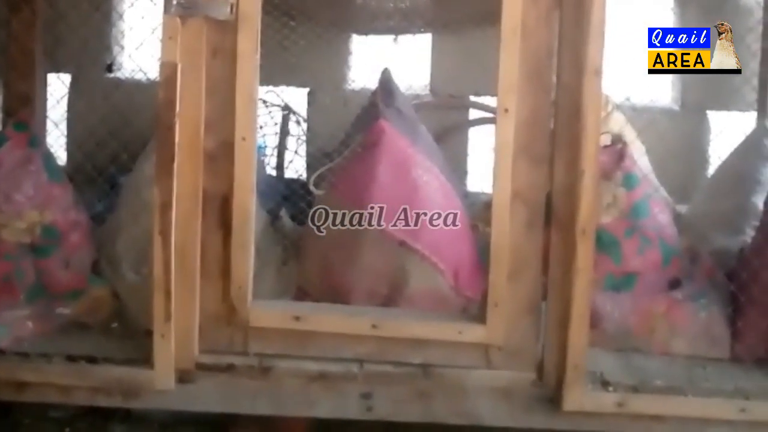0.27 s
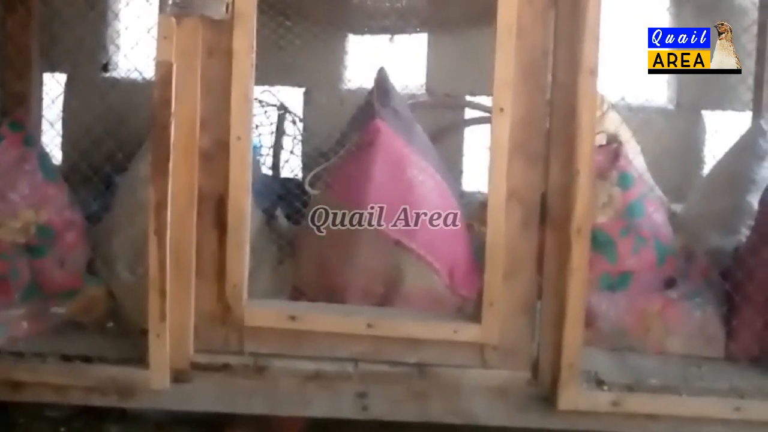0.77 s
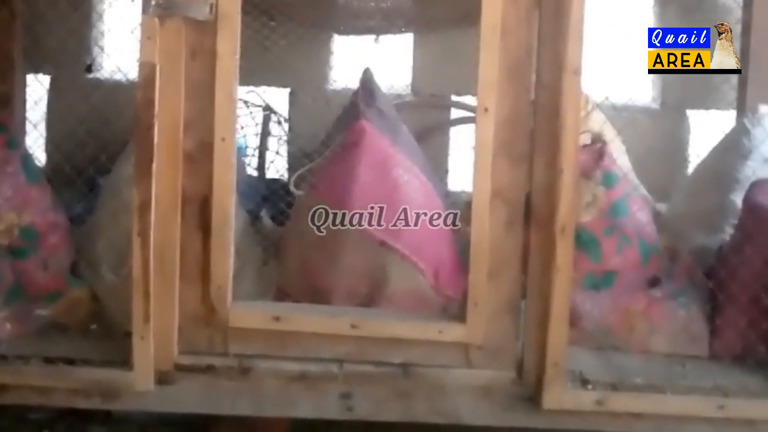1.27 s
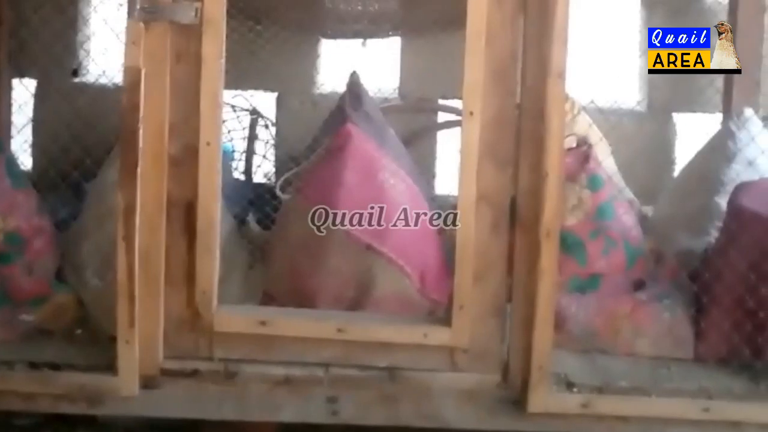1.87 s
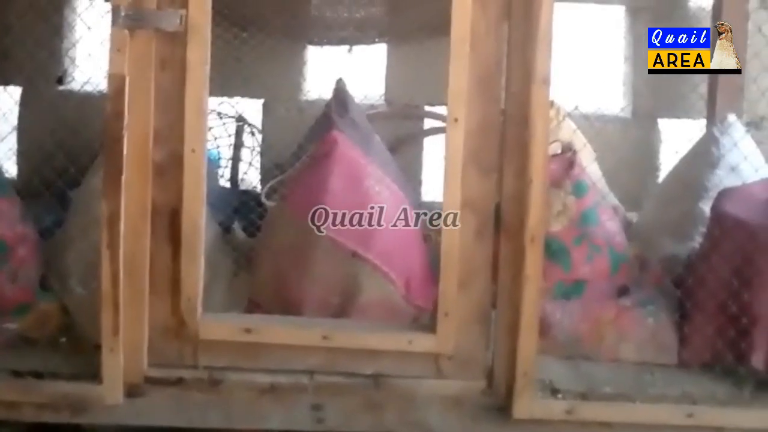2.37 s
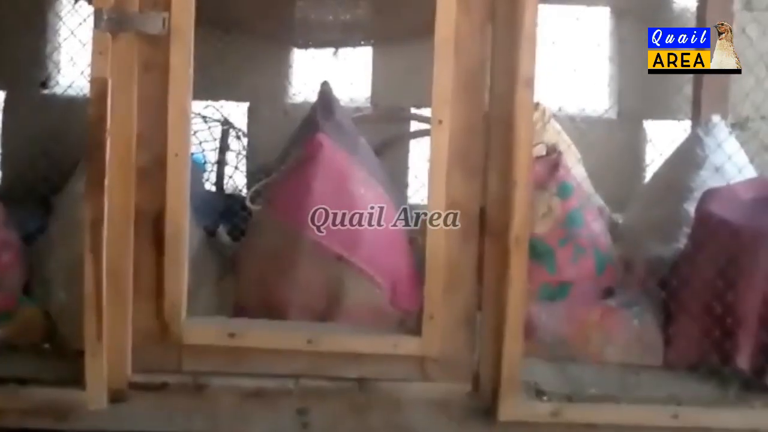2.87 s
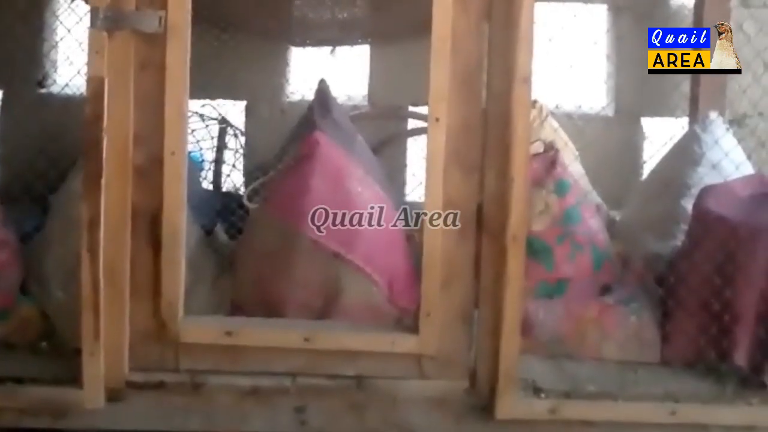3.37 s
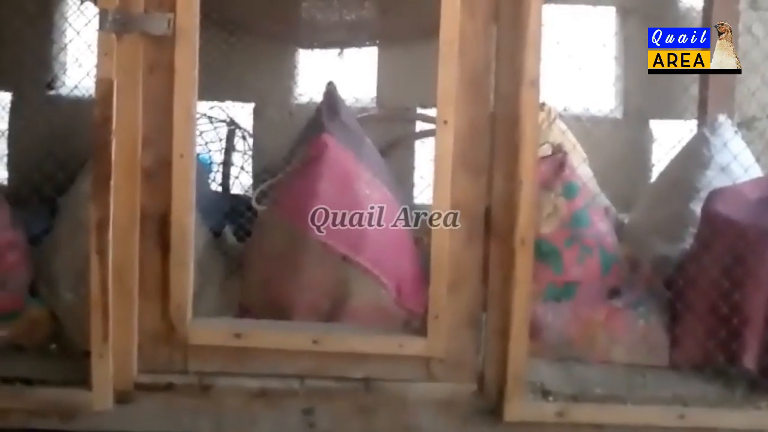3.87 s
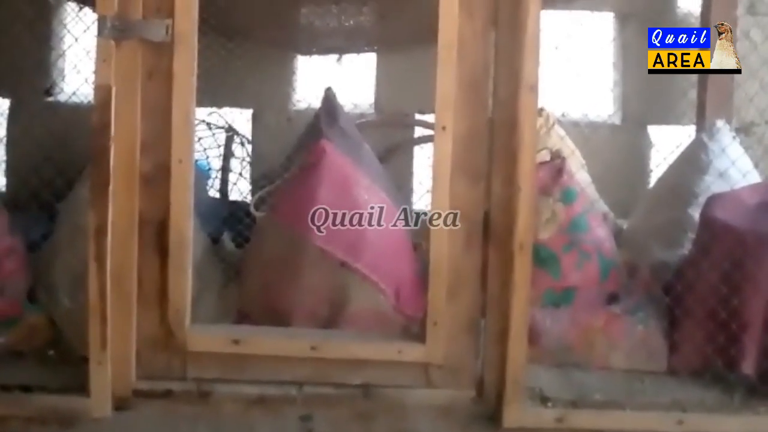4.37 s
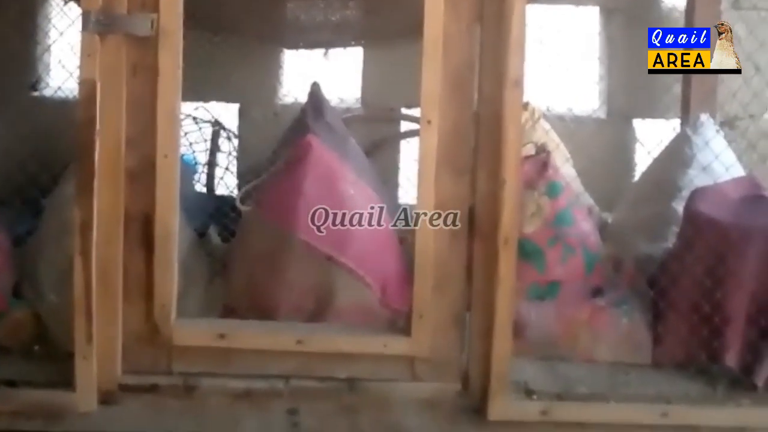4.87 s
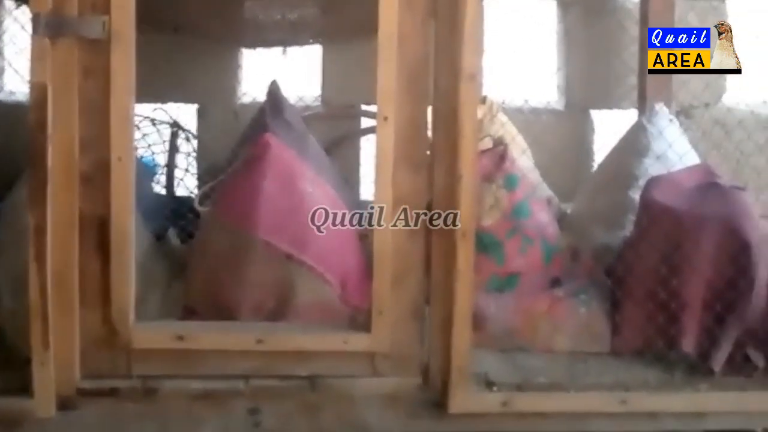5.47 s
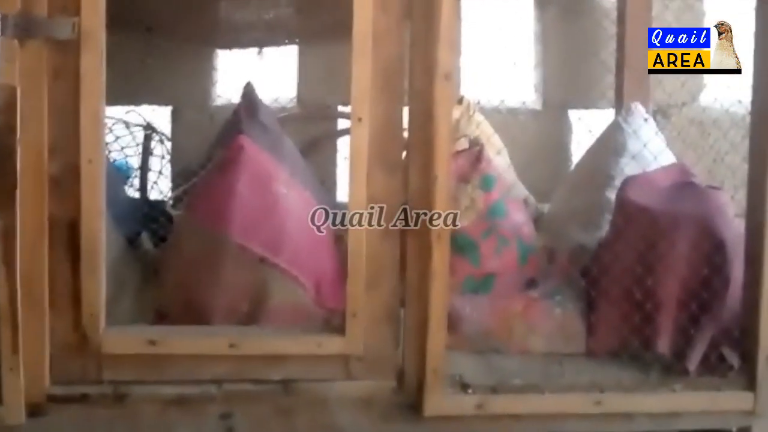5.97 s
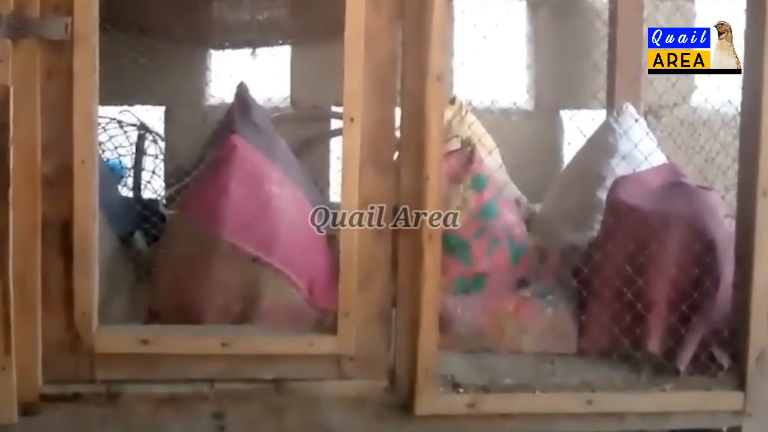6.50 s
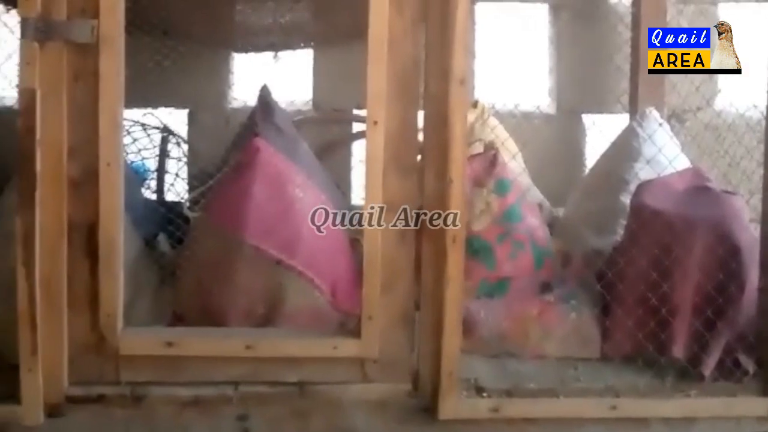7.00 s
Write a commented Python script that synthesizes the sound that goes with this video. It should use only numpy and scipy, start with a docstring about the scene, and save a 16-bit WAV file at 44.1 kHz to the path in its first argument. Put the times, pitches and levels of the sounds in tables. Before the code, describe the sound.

Several quails in wooden cages inside a hard-walled shed call over each other. High peeps flick upward and lower chips jump and slide back. In the first three seconds, the nearest bird gives three groups of three loud whipped whistles, overloading the close microphone, each with a short churr. Then two-part rasping crows come about once a second. The wooden cage thumps, and faint whines and distant cheeps sit in quiet room air.

```python
"""Caged quails in a hard-walled shed

Quails call over one another: high peeps flick upward, lower chips jump and slide back, and the nearest
bird whips out whistles that overload the microphone; all are gliding tones with a few overtones.
Two-part rasping crows, about once a second in the later part, and short churrs are fluttering buzzes
through a mouth resonance. Bumps ring the wooden cage; faint whines, distant cheeps and room air lie below.
"""
import sys
import numpy as np
from scipy import signal
from scipy.fft import rfft, irfft
from scipy.io import wavfile
from scipy.ndimage import map_coordinates

SR = 44100
rng = np.random.default_rng(int(sys.argv[2]) if len(sys.argv) > 2 else 0)


def store_pcm(level_fs):
    """Save levels as 16-bit WAV."""
    pcm = np.round(np.clip(level_fs, -1, 1) * 32767).astype(np.int16)
    wavfile.write(sys.argv[1], SR, np.atleast_2d(pcm).T)


N = 319284
TIME = np.arange(N) / SR  # s


def amp(db):
    """Decibels to gain."""
    return 10 ** (np.asarray(db) / 20)


def evened(x):
    """Scales to rms 1."""
    return x / np.sqrt(np.mean(x ** 2) + 1e-20)


def read(points, hz):
    """Reads a curve over frequency, interpolating on a log-frequency axis."""
    f, value = np.transpose(points)
    return np.interp(np.log(hz + 1), np.log(f + 1), value)


def coloured(x, points):
    """Filters by a spectrum in dB."""
    gain = amp(read(points, np.fft.rfftfreq(len(x), 1 / SR)))
    return irfft(rfft(x) * gain, len(x))


def waver(t, per_s):
    """Smooth random motion of about unit size, with per_s random points a second."""
    return map_coordinates(rng.standard_normal(512), [(t - t[0]) * per_s], order=3, mode="wrap")


def step(t, over_s):
    """A smooth rise from 0 to 1, half way at t = 0."""
    return .5 + .5 * np.tanh(t / over_s)


def bump(x, width):
    """A bell curve of height 1 around x = 0."""
    return np.exp(-(x / width) ** 2)


def gate(t, attack_s, release_s):
    """Attack, hold and release."""
    edge = np.minimum((t - t[0]) / attack_s, (t[-1] - t) / release_s)
    return np.sin(np.pi / 2 * np.clip(edge, 0, 1)) ** 2


def add(mix, s, sound):
    """Mixes a sound in at time s, trimming what falls outside."""
    at = round(s * SR)
    sound = sound[max(-at, 0):]
    part = mix[max(at, 0):][:len(sound)]
    part += sound[:len(part)]


def calls(rows, voice):
    """Plays one call for each row; the voice returns its start relative to the row's time."""
    out = np.zeros(N)
    for s, *shape in rows:
        lead, sound = voice(*shape)
        add(out, s + lead, sound)
    return out


def whistle(t, hz, db, overtones_db, jitter):
    """A nearly pure tone that follows a pitch and a level, with a few overtones."""
    hz = hz * (1 + jitter * waver(t, 350))
    phase = 2 * np.pi * np.cumsum(hz) / SR
    tone = np.sin(phase)
    for k, over_db in enumerate(overtones_db, 2):
        below_nyquist = k * hz < SR / 2
        tone = tone + amp(over_db) * np.sin(k * phase) * below_nyquist
    return np.sqrt(2) * tone * amp(db)


def air(room_db=-55, hiss_db=-69, drift_db=1.5):
    """Gently drifting room noise and a thin band of electronic hiss, both filtered white noise."""
    # tone of the air in the shed: (frequency [Hz], relative level [dB])
    room_colour = [(18, -48), (32, -21), (100, -17), (260, -12), (420, -16), (1100, -24), (1800, -22),
                   (2800, -16), (3500, -12), (5400, -19), (6500, -19), (7600, -35), (10000, -32),
                   (13300, -32), (15400, -32), (16000, -70)]
    band = [(12200, -40), (12500, -8), (12950, 0), (13150, -40)]  # Hz, relative dB
    room = evened(coloured(rng.standard_normal(N), room_colour)) * amp(drift_db * waver(TIME, 4.4))
    hiss = evened(coloured(rng.standard_normal(N), band))
    return amp(room_db) * room + amp(hiss_db) * hiss


def peep(length, pitch_hz, note_db, flick_db):
    """A held note sags, creeps up, then flicks up about an octave as it dies."""
    t = np.arange(-length - .003, .03, 1 / SR)
    # the sag of 9000 Hz/s ends 46 ms ahead of the flick, so a longer peep starts higher
    sag_hz = 9000 * np.maximum(-t - .046, 0)
    creep_hz = 260 * step(t + .016, .014)
    held_hz = pitch_hz + sag_hz + creep_hz
    top_hz = 7420 + 38 * flick_db  # softer flicks stop lower
    hz = held_hz + (top_hz - held_hz) * step(t - .0025, .007)

    along = np.clip(1 + t / length, 0, 1)
    swell_db = 3.7 * np.sin(np.pi * along ** 1.4)
    dip_db = -3 * bump(hz - 4150, 400)  # as the flick sets off
    fade_db = -1450 * np.maximum(t - .007, 0)  # 1450 dB/s after a 7 ms hold
    db = note_db + (flick_db - note_db) * along ** 1.5 + swell_db + dip_db + fade_db
    octave_db = -27 - 9 * step(t - .0025, .007)  # the overtone weakens in the flick
    return t[0], whistle(t, hz, db, (octave_db, -54), jitter=.0035) * gate(t, .011, .003)


def echoes(x, t60s, delay):
    """Sparse reflections of random sign in three patterns that take turns; each band dies at its own speed."""
    out = np.zeros(N)
    for k in range(3):
        taps = rng.choice([-1., 1.], SR) * (rng.random(SR) < 1 / 10) * (TIME[:SR] > delay)
        hz, t, bands = signal.stft(taps, SR, nperseg=128)
        decay = amp(-60 * t / read(t60s, hz)[:, None])
        tail = signal.istft(bands * decay, SR, nperseg=128)[1]
        # the three squared shares always add up to one
        share = np.sqrt(2 / 3) * np.cos(np.pi * (TIME + k / 3))
        out += signal.fftconvolve(x * share, tail / np.linalg.norm(tail))[:N]
    return out


def chip(length, pitch_hz, note_db, flick_db):
    """A swelling low note bends up, jumps to its top, then slides faintly back down."""
    top_hz, end_hz = 4950, 1450
    t = np.arange(-length - .003, .065, 1 / SR)
    held_hz = pitch_hz + 700 * np.clip(1 + t / length, 0, 1) ** 2.1
    flick = step(t, .0035)
    slide = step(t - .026, .009)
    hz = held_hz + (top_hz - held_hz) * flick + (end_hz - top_hz) * slide

    after = np.maximum(t, 0)
    # a fast fade of 1450 dB/s gives way to the faint slide, which fades at 420 dB/s
    fade_db = np.maximum(-1450 * after, -19 - 420 * after)
    db = note_db + (flick_db - note_db) * flick + fade_db
    # the note swells over 0.8 of its length
    return t[0], whistle(t, hz, db, (-35, -43), jitter=.007) * gate(t, .8 * length, .004)


def cheep(length, top_hz, db):
    """A quavering note that arches and falls; the quaver is a fast random waver of its pitch."""
    t = np.arange(0, length, 1 / SR)
    arch = [0, length / 4, length]
    hz = top_hz * np.interp(t, arch, [.92, 1, .82])
    level_db = db + np.interp(t, arch, [-12, 0, -6])
    return 0, whistle(t, hz, level_db, (-28,), jitter=.094) * signal.windows.tukey(len(t), .2)


def whip(level_db, pitch_hz, opening_db, noise_db=-26):
    """A soft low opening swells into a loud whistle that whips upward; thin treble noise follows its level."""
    # colour of the treble noise heard around the whistle: (frequency [Hz], relative level [dB])
    noise_colour = [(800, -25), (3000, -8), (7000, -3), (10500, 3), (12500, -9), (14500, -3)]
    first_hz, cut_s = 1300, .004
    t = np.arange(-.042, cut_s / 2, 1 / SR)
    # the whistle keeps climbing at 12000 Hz/s through its loudest moment, passing pitch_hz at -8 ms
    held_hz = pitch_hz + 12000 * (t + .008)
    bend = step(t + .024, .009)  # from the low opening up to the pitch
    flick_hz = 3300 * step(t + .0005, .0034)
    hz = first_hz + (held_hz - first_hz) * bend + flick_hz

    db = level_db + opening_db * step(-t - .0185, .0055)
    db = db - 7 * bump(hz - 2320, 170)  # the level dips as the pitch passes 2320 Hz
    noise = amp(db + noise_db) * coloured(rng.standard_normal(len(t)), noise_colour)
    return t[0], (whistle(t, hz, db, (-40, -46), jitter=.0032) + noise) * gate(t, .014, cut_s)


def rasp(t, hz, flutter_hz, gape_hz, swing=.042, depth=.4, throb=.21, width_hz=230, low_db=-13,
         kick_db=1, ring_s=.004):
    """A buzz with a fast flutter rings a mouth resonance that rises from the second harmonic as the beak opens."""
    mouth_hz = 2 * hz + gape_hz
    flutter = 2 * np.pi * np.cumsum(flutter_hz * (1 + .0069 * waver(t, 40))) / SR
    buzz_hz = hz * (1 + swing * np.sin(flutter) + .0032 * waver(t, 300))
    phase = 2 * np.pi * np.cumsum(buzz_hz) / SR

    k = np.arange(1, 9)[:, None]  # harmonic numbers
    # the mouth picks out one or two harmonics; the throat always passes those near 1150 Hz
    mouth = 1 / (1 + ((k * hz - mouth_hz) / width_hz) ** 2) ** .7
    throat = amp(low_db) / (1 + ((k * hz - 1150) / 200) ** 2)
    tilt = amp(read([(550, -5), (1100, -1.5), (3900, 1), (5000, -15)], k * hz))
    gains = (mouth + throat) * tilt
    gains = gains / np.linalg.norm(gains, axis=0)
    # the flutter splits each harmonic into close lines
    split = 1 + depth * np.cos(2 * flutter + 1.21 * k)
    buzz = (gains * split * np.sin(k * phase)).sum(0)

    # each flap also kicks the mouth, which rings at its own pitch
    age = flutter % (2 * np.pi) / (2 * np.pi * flutter_hz)  # s since the flap
    kick = np.exp(-age / ring_s) * abs(np.sin(flutter / 2)) ** .47 * np.sin(2 * np.pi * mouth_hz * age)
    # a higher mouth resonance throbs harder
    beats = np.exp(throb * np.cos(flutter - 1) * mouth_hz / 2500)
    return evened(coloured((buzz + 2 * amp(kick_db) * kick) * beats, [(300, -12), (520, 0)]))


def churr(level_db, pitch_hz):
    """A short rasp through a closing beak, with an accent when it is half shut."""
    t = np.arange(-.047, .062, 1 / SR)
    db = level_db + 8 * bump(t, .011)
    gape_hz = 2050 * step(-t, .022)
    sound = rasp(t, pitch_hz + 900 * t, 87, gape_hz)  # climbs 900 Hz/s, flutters at about 87 Hz
    return t[0], amp(db) * sound * gate(t, .014, .014)


def cage(rattle_t60=.38):
    """Each bump rings the damped modes of the wooden frame and briefly rattles the wire."""
    # bumps: (time [s], ring level [dB], rattle level [dB], lowest mode that is shaken [Hz])
    bumps = [(1.149, -39.5, -60.5, 110), (1.27, -39.5, -77.5, 100), (1.369, -52.5, -81.5, 100),
             (4.932, -34, -46, 150), (4.958, -24, -36, 80), (5.029, -29, -43.5, 70),
             (5.082, -29, -32.5, 100), (5.164, -35.5, -62, 90), (6.153, -24.5, -33.5, 190),
             (6.241, -39.5, -59, 190)]
    # modes of the wood ahead of a small random detune: (frequency [Hz], relative level [dB], t60 [s])
    wood = [(82, -5.5, 0.94), (111.6, 4, 0.55), (129, -3, .35), (169.8, -2.5, 0.68), (202.5, -3.5, 0.54),
            (234.2, -2.5, 0.27), (331, -8, 0.18), (452, -7.5, 0.079), (580, -13.5, 0.13)]
    wire = [(40, -24), (200, -3.5), (700, -10), (1400, -6), (3000, -18.5), (9000, -46.5)]  # Hz, dB
    out, t = np.zeros(N), np.arange(SR // 2) / SR
    for s, db, rattle_db, low_hz in bumps:
        ring = np.zeros(len(t))
        for hz, mode_db, t60 in wood:
            level = amp(mode_db - 60 * t / t60) / (1 + (low_hz / hz) ** 8)
            cycles = hz * rng.uniform(.99, 1.03) * t + rng.random()
            ring += level * np.sin(2 * np.pi * cycles)
        rattle = evened(coloured(rng.standard_normal(len(t)), wire))
        sound = amp(db) * ring + amp(rattle_db - 60 * t / rattle_t60) * rattle
        add(out, s, sound * (1 - np.exp(-t / .0017)))  # soft onset
    return out


def whine(length, first_hz, last_hz, db):
    """A soft, nasal, slowly sliding note, strongest on its third and fourth harmonics."""
    t = np.arange(0, length, 1 / SR)
    hz = np.linspace(first_hz, last_hz, len(t))
    level_db = np.linspace(db - 14, db - 21.5, len(t))
    return 0, whistle(t, hz, level_db, (2, 13, 13, 1), jitter=.029) * signal.windows.tukey(len(t), .4)


def crow(level_db, top_hz, gape):
    """The pitch climbs and droops while the beak opens twice; the wider the beak, the louder."""
    # the beak's two openings: (opens at [s], opening takes [s], shuts at [s], shutting takes [s],
    # rise of the mouth resonance before the gape factor [Hz])
    gapes = [(-.1, .026, -.009, .008, 1080), (.095, .02, .183, .05, 1900)]
    after_s, peak_s = .217, .085
    t = np.arange(-.167, after_s, 1 / SR)
    late = np.maximum(t - peak_s, 0) / (after_s - peak_s)
    hz = top_hz - 620 * np.maximum(peak_s - t, 0) - 120 * late ** 2  # climbs 620 Hz/s, droops 120 Hz
    gape_hz = 0
    for opens, opening, shuts, shutting, rise_hz in gapes:
        gape_hz = gape_hz + gape * rise_hz * step(t - opens, opening) * step(shuts - t, shutting)
    # the flutter quickens as the second part begins, then settles
    flutter_hz = np.where(t < 0, 64.5, 71 + 24 * bump(t, .055))
    db = level_db + 22 * t + .006 * gape_hz
    return t[0], amp(db) * rasp(t, hz, flutter_hz, gape_hz) * gate(t, .055, .04)


def scene():
    """The nearest bird is almost dry; the other calls bring cage walls or shed, the cheeps only echoes."""
    # all levels below are ahead of the mix and the microphone
    # high peeps: (time of the flick [s], length before it [s], pitch [Hz], note level [dB], flick level [dB])
    peep_rows = [(.082, .086, 3335, -13, -19.5), (.128, .049, 3156, -21.5, -25.5),
                 (.313, .05, 3320, -11.5, -18.5), (.357, .055, 3250, -25, -19.5),
                 (.555, .075, 3220, -19, -17), (.838, .066, 3200, -17.5, -15.5),
                 (1.571, .066, 3320, -9, -18), (1.618, .059, 3175, -16, -22),
                 (1.798, .056, 3320, -10.5, -18), (1.84, .087, 3184, -22, -17),
                 (1.909, .067, 3200, -17.5, -15), (2.202, .071, 3252, -15.5, -14.5),
                 (3.072, .075, 3300, -15, -15.5), (3.112, .055, 3314, -9.5, -19),
                 (3.28, .086, 3325, -16, -17.5), (3.306, .041, 3287, -10, -19),
                 (3.336, .04, 3210, -15, -16), (3.57, .064, 3222, -12, -15.5),
                 (4.593, .06, 3248, -10, -17.5), (4.647, .04, 3364, -11.5, -16),
                 (4.817, .053, 3297, -12, -18), (4.939, .066, 3215, -12.5, -16),
                 (6.025, .088, 3320, -14, -15.5), (6.072, .049, 3314, -13, -18),
                 (6.183, .045, 3285, -22, -33), (6.3, .047, 3220, -8.5, -18),
                 (6.319, .029, 3330, -19, -14.5), (7.175, .087, 3190, -17, -18.5)]
    # lower chips: (time of the flick [s], length before it [s], pitch [Hz], note level [dB], flick level [dB])
    chip_rows = [(.355, .03, 2040, -20.5, -19), (.768, .04, 2200, -13, -13), (.985, .031, 2250, -18, -28),
                 (1.515, .028, 2064, -20.5, -15), (1.93, .041, 2200, -12.5, -14),
                 (2.157, .034, 2166, -18, -27), (3.445, .035, 2100, -18, -18),
                 (3.677, .047, 2050, -20, -23), (4.098, .028, 2300, -14.5, -19),
                 (4.517, .04, 2184, -15.5, -15), (4.737, .045, 2093, -19, -27),
                 (5.193, .032, 2280, -14.5, -16), (5.611, .04, 2217, -14.5, -15),
                 (5.828, .041, 2122, -22, -32), (6.747, .041, 2200, -13.5, -15),
                 (6.964, .04, 2127, -23, -35)]
    # cheeps from farther cages: (time [s], length [s], top of the arch [Hz], level [dB])
    cheep_rows = [(.44, 0.055, 4870, -49.5), (1.28, 0.14, 4475, -44.5), (1.42, .08, 6600, -49.5),
                  (2.4, 0.19, 4220, -58.5), (2.56, .12, 3960, -54.5), (2.82, 0.077, 6310, -58.5),
                  (4.45, .1, 4420, -38), (5.44, .14, 4190, -46), (5.74, 0.043, 6000, -53.5),
                  (6.52, 0.055, 4320, -41), (6.84, 0.036, 2960, -42)]
    # near whips: (time of the flick [s], level [dB], pitch [Hz], low opening relative to the level [dB])
    whip_rows = [(.709, -8.5, 2030, -36), (.922, -3, 2100, -29), (1.053, -2.5, 2080, -27),
                 (1.745, -2, 2060, -38), (1.953, -1, 2080, -27), (2.08, -1, 2060, -23),
                 (2.765, -2.6, 2060, -38), (2.975, -1, 2080, -28), (3.103, -1, 2080, -25)]
    # churrs between two whips: (time when the beak is half shut [s], level [dB], pitch [Hz])
    churr_rows = [(.977, -27.5, 510), (2.007, -25, 560), (3.029, -24, 548)]
    # faint whines: (time [s], length [s], first pitch [Hz], last pitch [Hz], level setting [dB])
    whine_rows = [(2.5, 0.3, 530, 460, -58), (3.78, 0.23, 690, 590, -55), (4.42, .25, 520, 453, -48.5),
                  (5.42, 0.25, 649, 491, -51), (5.72, .07, 447, 509, -56.5), (6.83, 0.12, 447, 496, -60)]
    # crows: (time of the beak's closing between the parts [s], level [dB], top pitch [Hz], gape factor)
    crow_rows = [(3.256, -32.5, 595, 1.0), (4.229, -29, 642, 1.02), (5.206, -28, 660, 1.05),
                 (6.211, -28.5, 665, 1.04), (7.24, -30.5, 649, 1.08)]
    # ring of the shed: (frequency [Hz], t60 [s])
    shed = [(500, .5), (2000, 0.18), (3500, 0.41), (7000, 0.25), (12000, 0.13)]
    # colour of the microphone: (frequency [Hz], level [dB])
    microphone = [(100, -9.5), (1000, 3.5), (3300, 0), (5000, 0.5), (6900, 1), (7400, 0), (10000, -6.5),
                  (12000, -9), (15000, -9)]
    walls = [(1500, .11), (3300, .13), (6500, .17), (10000, .073)]  # ring of the cage walls: Hz, t60 s

    peeps, chips, whips = calls(peep_rows, peep), calls(chip_rows, chip), calls(whip_rows, whip)
    buzzes = calls(crow_rows, crow) + calls(churr_rows, churr)
    whines, cheeps = calls(whine_rows, whine), calls(cheep_rows, cheep)

    direct = amp(-2) * peeps + amp(-1) * chips + whips + buzzes + amp(-5.5) * whines + cage()
    to_walls = amp(-6) * peeps + amp(-6.5) * chips + amp(-22) * whips
    to_walls += amp(-13) * buzzes + amp(-3) * whines + amp(-2) * cheeps
    to_shed = amp(-22.5) * peeps + amp(-23) * chips + amp(-54) * whips
    to_shed += amp(-37.5) * buzzes + amp(-7.5) * cheeps
    wet = echoes(to_walls, walls, delay=.004) + echoes(to_shed, shed, delay=.04)
    return (coloured(direct + wet, microphone) + air())[None]


def record(dry, ceiling=1.04, knee=24, edge_hz=15600):
    """The loudest whistles flatten against the ceiling; then a low-pass sets the band limit."""
    fine = signal.resample_poly(dry, 2, 1, axis=1)  # oversampled to limit aliasing
    flattened = fine / (1 + abs(fine / ceiling) ** knee) ** (1 / knee)
    clipped = signal.resample_poly(flattened, 1, 2, axis=1)
    low_pass = signal.firwin(511, edge_hz, window=("kaiser", 9), fs=SR)
    return signal.oaconvolve(clipped, low_pass[None], "same")


dry = scene()
out = record(dry)
store_pcm(out)
```